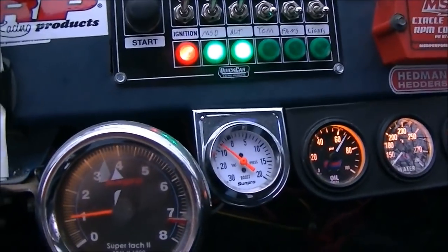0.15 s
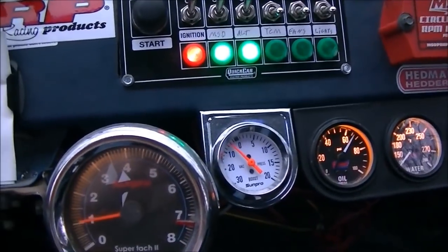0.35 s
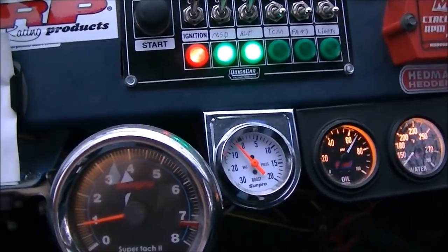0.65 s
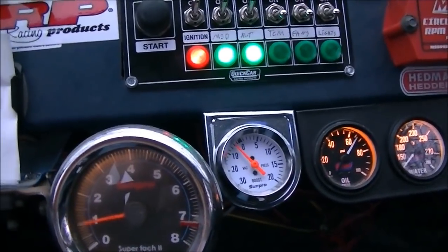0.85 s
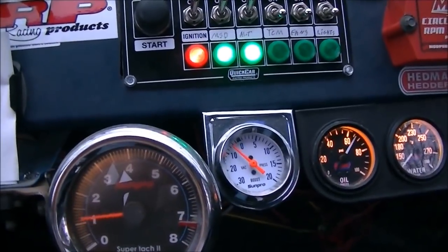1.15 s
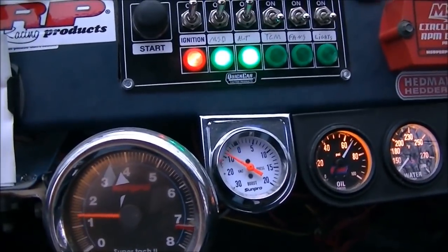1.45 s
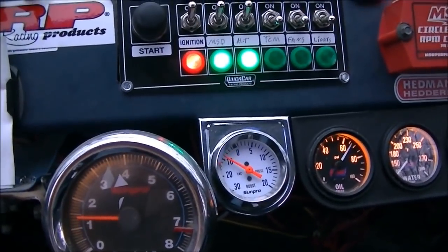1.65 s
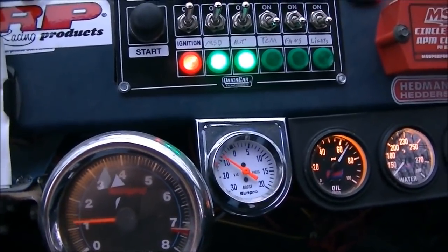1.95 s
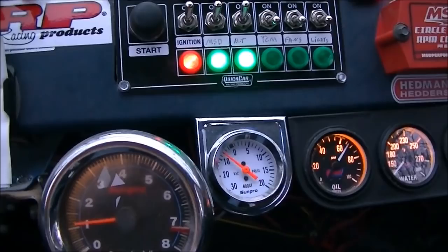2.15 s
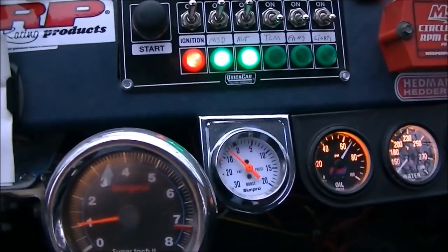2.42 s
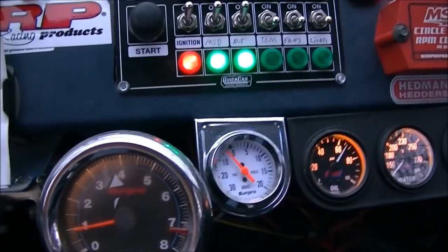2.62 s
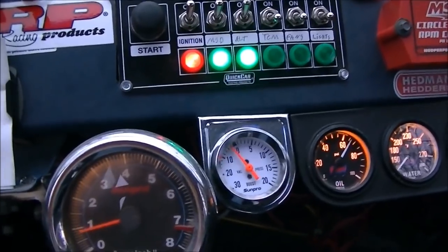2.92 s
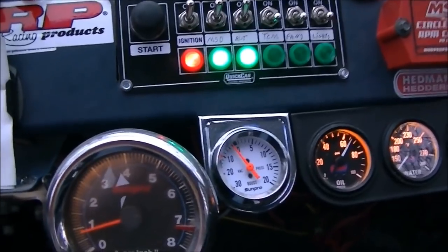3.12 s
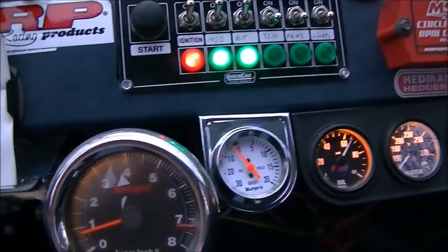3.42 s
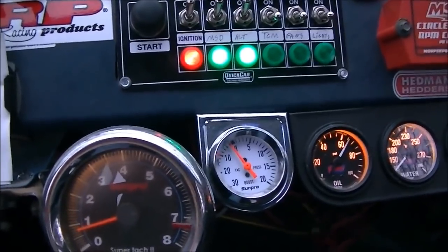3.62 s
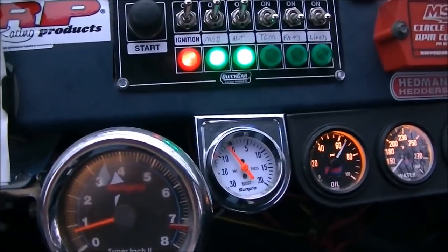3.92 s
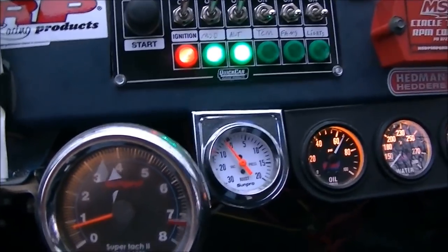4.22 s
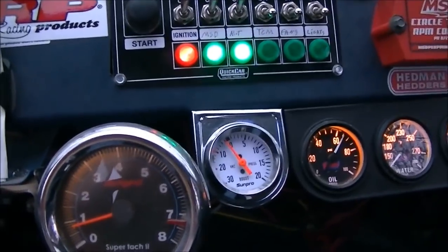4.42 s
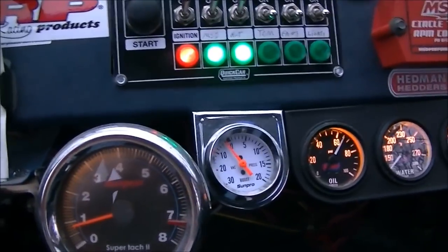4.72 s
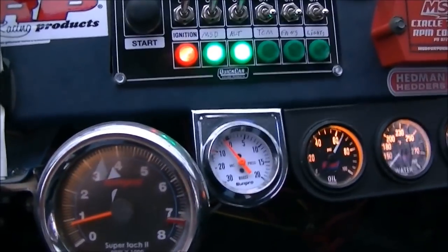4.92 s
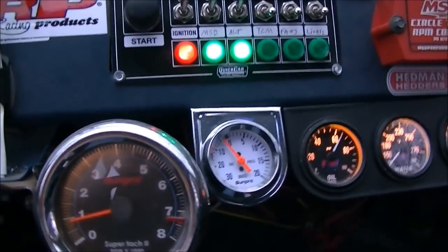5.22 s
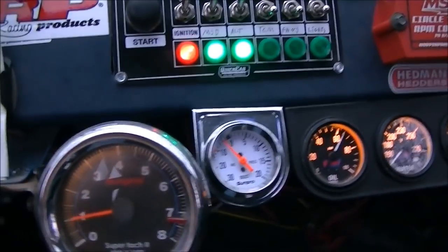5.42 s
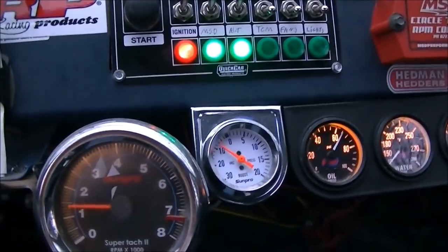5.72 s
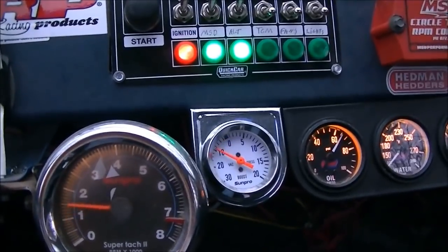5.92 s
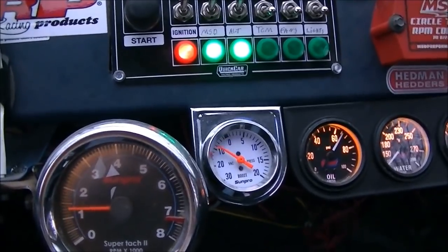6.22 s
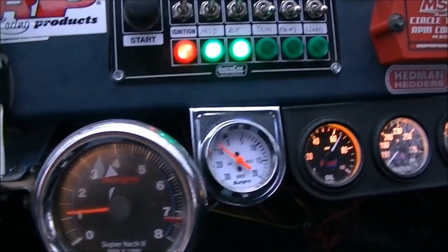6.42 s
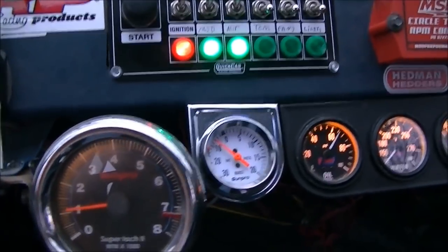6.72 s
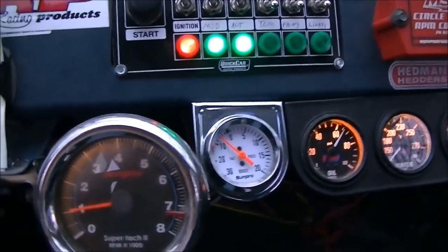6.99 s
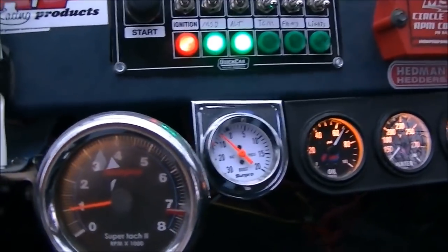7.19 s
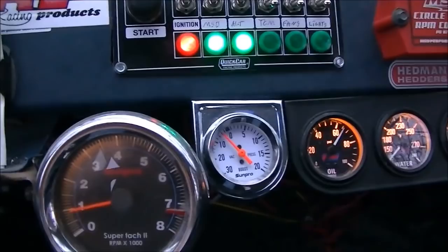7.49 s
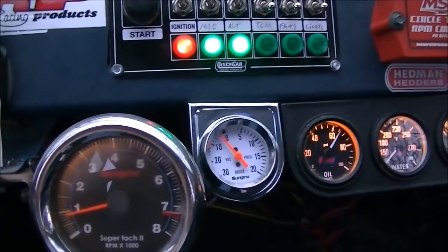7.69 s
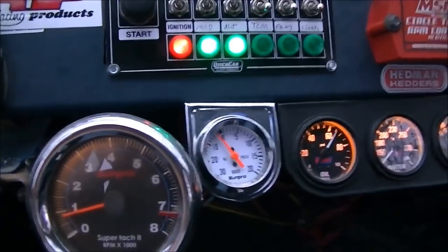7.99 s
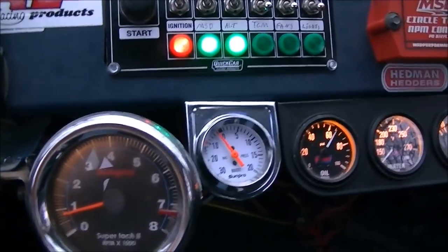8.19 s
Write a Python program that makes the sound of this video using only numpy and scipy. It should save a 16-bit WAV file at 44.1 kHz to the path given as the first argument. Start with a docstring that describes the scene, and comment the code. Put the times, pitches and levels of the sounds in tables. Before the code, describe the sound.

A big supercharged V8 engine idles unevenly throughout, heard close from inside a truck cab. Each firing gives a deep, boomy thump and a bright hissing puff from the open exhaust pipes, with a growl in the panels. Irregular stronger firings chuff loudly and leave a brief hollow ring in the pipes. Underneath run a low drone that follows the revs and a faint supercharger pulse. At about 1 second the revs swell gently, peaking near 1.5 seconds, then sag by 2.5 seconds into a slow, lumpy lope. At about 5.3 seconds they swell again, a little higher, peaking just before 6 seconds with a fuller, smoother drone. The engine eases down through 6.5 seconds and is back at its slow, choppy idle from about 7.6 seconds until the end at around 8.4 seconds.

```python
"""Inside a truck cab, a big supercharged V8 lopes at idle; twice the revs swell and sag again.
Every firing thumps the cab's low modes and blows a puff of gas out of the open pipes: a bright hiss
with a growl in the panels, drawn out by the surroundings. Under it run a drone at the firing rate and
the blower's faint pulse. On a lumpy cam only some cylinders catch well; those chuff loudly and set
the pipes ringing."""
import sys
import numpy as np
from scipy import signal
from scipy.fft import rfft, irfft, next_fast_len
from scipy.io import wavfile
from scipy.ndimage import uniform_filter1d

SR = 44100
rng = np.random.default_rng(int(sys.argv[2]) if len(sys.argv) > 2 else 0)


def bounce(signal):
    """Save signal as a 16-bit WAV file at the path given by the first command-line argument."""
    frames = np.transpose(np.atleast_2d(signal))
    limited = np.clip(frames, -1, 1)
    pcm = np.round(limited * 32767).astype(np.int16)
    wavfile.write(sys.argv[1], SR, pcm)


N = 368235

# revs and base levels of ordinary firings: t/s, firing rate/Hz, drone/dB, thump/dB, hiss/dB, growl/dB
REVS = [(0, 71.5, -24, -20.5, -51.5, -37), (.45, 67.1, -29.5, -23.5, -48.5, -36.5),
        (.8, 63.17, -24.5, -25.5, -57, -38), (1.05, 83, -31.5, -22.5, -47, -34),
        (1.17, 93.1, -19, -27, -49.5, -34), (1.4, 102.1, -22, -21.5, -51.5, -37),
        (1.7, 97.3, -24, -28.5, -55, -37.5), (1.9, 83.36, -27, -29.5, -51.5, -43.5),
        (2.02, 75.34, -44, -21, -51, -36.5), (2.3, 74.17, -34, -21.5, -51, -38),
        (2.55, 57.9, -26.5, -22, -51.5, -39.5), (2.8, 55.56, -28.5, -27.5, -52, -42),
        (3.1, 52.97, -30.5, -29, -62, -42), (3.8, 53.22, -30.5, -27, -54, -38.5),
        (4.3, 53.26, -30.5, -28, -57.5, -43), (4.6, 54.99, -32, -27, -66, -45),
        (4.85, 58.05, -29, -23.5, -54, -38.5), (5.12, 55.2, -29, -28, -55, -35.5),
        (5.4, 78.53, -34, -22, -48.5, -40), (5.55, 89.78, -19.5, -27, -47, -33.5),
        (5.72, 107.4, -19.5, -32, -51, -32), (5.86, 113.3, -16.5, -30, -51, -37),
        (6.0, 100.9, -26, -25.5, -56, -42), (6.2, 86.9, -26.5, -23, -53, -37.5),
        (6.45, 76.76, -27, -21, -50.5, -36.5), (6.95, 75.14, -32, -22, -53.5, -39),
        (7.35, 68.11, -35, -22, -57, -38.5), (7.65, 54.25, -29.5, -26, -57, -42.5),
        (8.05, 51.74, -31, -29, -58, -41), (8.35, 54.8, -30, -28, -55, -42)]
# strong firings: t/s, hiss peak/dB, growl peak over hiss peak/dB, # loss by the next firing/dB (sign ignored),
# thump size
CHUFFS = [(0.0924, -37, 3.5, 0.5, 1.36), (0.1387, -39, -3, 1.5, 1.16), (0.1827, -38, 3, 5.5, 1.26),
          (0.2823, -42, -2, 5, 1.1), (0.3262, -37, 3.5, 3, 1.06), (0.3727, -32, -2, 8.5, 1.9),
          (0.4181, -34, 4.5, 3, 1.24), (0.5226, -38, 8, 2, 2.1), (0.5698, -34, 3.5, 10, 1.6),
          (0.614, -32.5, -2, 6, 1.6), (0.6562, -34.5, 0.5, 4, 1.25), (0.7249, -38.5, 1, 1.5, 1.7),
          (0.7651, -37, 5.5, -1, 1.6), (0.8076, -32.5, 8.5, 5, 1.8), (0.8505, -34.5, 3, 2, 1.5),
          (0.892, -34.5, 2.5, 5, 1.78), (0.9877, -36, 3.5, -0.5, 1.24), (1.0648, -35, 7, 1, 1.04),
          (1.1225, -35.5, 6, 1, 0.94), (1.2416, -39, 11, 5, 0.62), (1.2847, -40, 9, 7, 1.3),
          (1.4282, -35, 4, 3, 1.3), (1.584, -40, 8, 1.5, 1.2), (1.692, -41.5, 8.5, 1, 1.1),
          (1.8608, -42.5, 9.5, 0, 1.48), (1.9065, -38.5, 8, 0.5, 1.05), (1.959, -37, 6, 0.5, 1.3),
          (2.0591, -47, -2, 7, 1.5), (2.1109, -43, 5, 2, 1.03), (2.1488, -35, -0.5, 2, 1.34),
          (2.1993, -35.5, 7, 12, 1.7), (2.3337, -46, -1, 3, 1.3), (2.4096, -41.5, 7.5, 3, 1.04),
          (2.4456, -35, 3, 5, 1.5), (2.5071, -35.5, 4, 1, 1.35), (2.5866, -33, 0.5, 2.5, 1.4),
          (2.6783, -42, 6, 1, 1.4), (2.812, -39, 2, 8, 1.5), (2.8805, -38, -1, 3, 1.2),
          (2.9234, -41, -5, 9, 0.92), (2.986, -37, 2.5, 1, 1.2), (3.044, -35.5, 0, 13, 1.72),
          (3.096, -35, 4.5, 2, 1.9), (3.2233, -38, -6, 7, 1.47), (3.2876, -44.5, -6, 3, 1.35),
          (3.3304, -38, 3, 3, 1.8), (3.404, -37, 3, 1, 1.75), (3.5013, -38.5, 0, 13, 0.87),
          (3.5551, -38, 3, 3.5, 1.3), (3.6304, -55, 4, 0, 1), (3.6895, -37, -1, 10, 1.4),
          (3.7454, -40.5, 1, 3, 1.36), (3.8006, -36, 7, 8.5, 1.8), (3.8532, -38, -6, 1.5, 1.296),
          (4.006, -32, 1.5, 7, 1.68), (4.097, -37, 3, 9, 1.9), (4.1945, -40, 5, 0.5, 1.397),
          (4.3038, -35.5, 4.5, 2, 1.5), (4.3881, -35, 2, 4.5, 1.47), (4.48, -39.5, 4.5, 1, 1.09),
          (4.595, -35, 5, 2.5, 1.43), (4.6853, -34.5, 4, 1, 1.6), (4.767, -38, 4, 3, 1.26),
          (4.817, -34, 3.5, 11, 1.6), (4.8656, -33.5, 2.5, 4, 1.12), (4.9296, -35, 4.5, 3, 1.21),
          (4.9529, -33.5, 1, 2, 1.5), (5.031, -36.5, 8.5, 8.5, 1.21), (5.0775, -35.5, 1.5, 7, 1.2),
          (5.1293, -32, -6, 6, 1.7), (5.1601, -33, -8, 11, 1.4), (5.2071, -33, 4, 2, 1.65),
          (5.253, -32.5, 5.5, 3.5, 1.324), (5.3114, -35, 7.5, 4, 1.9), (5.3674, -34.5, 3.5, 3, 1.52),
          (5.3961, -33.5, 7, 2, 1.57), (5.433, -33, 6.5, 3, 1.4), (5.4954, -34, 7.5, 10, 0.98),
          (5.5289, -33.5, 1, 9, 1.4), (5.7144, -34, 3, 3, 1.06), (5.8633, -39, 9.5, 4, 0.94),
          (5.988, -40, 9, -1, 1.2), (6.04, -41, 5, -2.5, 1.7), (6.1894, -39.5, 7, 4, 1.4),
          (6.3737, -35.5, 5.5, 2.5, 1.4), (6.4519, -34, 6, 8, 2.18), (6.5176, -46, -1, 5, 1.64),
          (6.5984, -34, 3.5, 4, 1.5), (6.6612, -34.5, 3.5, -2.5, 1.6), (6.7291, -37, -9, 9, 1.94),
          (6.7954, -36, 3, 3, 1.2), (6.8792, -33, 3, 1.5, 1.7), (6.9485, -35, 5.5, 1.5, 1.509),
          (7.018, -34.5, 0.5, 1.5, 1.45), (7.1096, -33, 3, 6.5, 1.4), (7.1823, -36, 2, 5, 1.13),
          (7.2563, -34.5, 2, 1, 1.4), (7.3458, -34.5, -5, 5, 1.4), (7.4228, -35.5, 1, 6, 1),
          (7.5072, -37.5, -2, 2, 1.47), (7.6132, -34, 1.5, 8.5, 1.43), (7.7039, -39.5, 3, 4, 1.58),
          (7.8004, -36, 2, 1.5, 1.46), (7.907, -36, 5.5, 7, 1.4), (7.994, -40, 6, 13, 1.17),
          (8.0651, -41, 5.5, 2, 1.9), (8.1458, -38.5, 3, 0.5, 1.4), (8.1919, -34, 4, 5.5, 1.87),
          (8.2528, -36.5, 5.5, 4, 1.38), (8.3183, -37.5, 7.5, 0, 1.04)]
# low modes of cab and pipes: f/Hz, width/Hz, level/dB
CAB_MODES = [(46, 30.8, -5.5), (97.9, 23.5, 2), (123.3, 15.6, 2), (152.5, 22.5, -14), (200.3, 13.5, -19),
             (269.7, 8.8, -24), (309, 24, -22.5), (386, 34, -25)]


def amp(db):
    return 10 ** (np.asarray(db) / 20)


def along(points, hz):
    """(f/Hz, value) points, read on a log frequency axis."""
    f, v = np.transpose(points)
    return np.interp(np.log(hz + 1), np.log(f + 1), v)


def revs_at(t):
    """Firing rate and the drone, thump, hiss and growl levels at times t."""
    s, *columns = np.transpose(REVS)
    return [np.interp(t, s, c) for c in columns]


def filtered(x, response):
    """x shaped by a complex frequency response."""
    m = next_fast_len(N + SR // 2)
    return irfft(rfft(x, m) * response(np.fft.rfftfreq(m, 1 / SR)), m)[:N]


def modes(table):
    """The response of a bank of resonances of alternating polarity."""
    return lambda f: sum((-1) ** k * amp(db) * 1j * f * width / (hz * hz - f * f + 1j * f * width)
                         for k, (hz, width, db) in enumerate(table))


def train(times, sizes):
    """One impulse for each firing."""
    return np.bincount(np.clip(np.round(times * SR).astype(int), 0, N - 1), sizes, N)


def puffs(times, db, rise_s, fall_t60, echo_t60, echo_db):
    """Envelope of overlapping gas bursts and their echo from the surroundings: powers add."""
    step_s = .0005
    t = np.arange(0, .5, step_s)
    decay = amp(-120 * t / fall_t60) + amp(2 * echo_db - 120 * t / echo_t60)
    shape = (1 - np.exp(-t / rise_s)) ** 2 * decay
    starts = np.bincount(np.round(np.clip(times, 0, None) / step_s).astype(int), amp(2 * db))
    power = np.abs(signal.fftconvolve(starts, shape / shape.max()))
    return np.interp(np.arange(N) / SR, np.arange(len(power)) * step_s, np.sqrt(power))


def firings():
    """The crank: firings counted up to each sample, their times, and the indices of the strong ones."""
    t = np.arange(N) / SR
    count = np.cumsum(revs_at(t)[0]) / SR
    chuff_s = np.transpose(CHUFFS)[0]
    loping_s = chuff_s[revs_at(chuff_s)[0] < 78]  # at low revs the crank keeps step with the chuffs
    angle = 2 * np.pi * np.interp(loping_s, t, count)
    slip = np.arctan2(uniform_filter1d(np.sin(angle), size=5), uniform_filter1d(np.cos(angle), size=5))
    count -= np.interp(t, loping_s, np.unwrap(slip)) / (2 * np.pi)
    times = np.interp(np.arange(np.ceil(count[0]), count[-1]), count, t)
    return count, times, np.abs(times - chuff_s[:, None]).argmin(axis=1)


def lope(times, strong):
    """After a good catch, cylinders catch less and less: each firing's chuff, and its dB below it."""
    index = np.arange(len(times))
    chuff = np.clip(np.searchsorted(strong, index, side="right") - 1, 0, None)
    lack_db = np.abs(np.transpose(CHUFFS)[3][chuff]) * np.abs(index - strong[chuff]) ** 1.85
    lead_in = np.setdiff1d(np.clip(strong - 1, 0, None), strong)  # the firing just before a strong one
    chuff[lead_in], lack_db[lead_in] = np.searchsorted(strong, lead_in), 5.5
    return chuff, lack_db


def drone(count, times, strong):
    """Firings merge into a note that swells with each good catch."""
    # straight from the pipes: multiple of the firing rate, level against the note/dB
    pipe_orders = [(2, -15), (4, -25.5)]
    # fed into the cab's modes: multiple of the firing rate, level against the note/dB
    cab_orders = [(1.25, -8.5), (2, -12)]
    t = np.arange(N) / SR
    caught_db = np.clip(3.5 - lope(times, strong)[1], 0, None)
    swell_db = 0.31 * np.interp(t, times, caught_db - caught_db.mean())
    level = np.sqrt(2) * amp(revs_at(t)[1] + swell_db)
    note = np.sin(2 * np.pi * (count + 0.038))
    overtones = sum(amp(db) * np.sin(2 * np.pi * order * count) for order, db in pipe_orders)
    cab_tones = sum(amp(db) * np.sin(2 * np.pi * order * count) for order, db in cab_orders)
    return level * (note + overtones) + filtered(level * cab_tones, modes(CAB_MODES))


def blower(count, pulses_per_firing=2.67):
    """The supercharger's rotors pulse faintly through the cab's modes, harder as the revs climb."""
    octaves = np.log2(revs_at(np.arange(N) / SR)[0] / 70)
    rotors = amp(-29.5 + 21 * octaves) * np.sin(2 * np.pi * pulses_per_firing * count)
    return filtered(rotors, modes(CAB_MODES))


def thump(times, strong):
    """Each firing pushes the cab's low modes; charge and timing differ from one to the next."""
    # cylinders in firing order: charge over or under the mean
    cylinders = [0.31, 0.32, -0.43, -0.056, 0.21, 0.083, -0.26, 0.11]
    charge_luck, timing_luck = rng.uniform(-1, 1, (len(times), 2)).T
    size = .05 + np.resize(cylinders, len(times)) + 0.92 * charge_luck
    chuff, lack_db = lope(times, strong)
    catch = np.transpose(CHUFFS)[4][chuff] * amp(-lack_db)
    size = np.where(catch > .55, catch + 0.34 * charge_luck, size)  # a good catch carries its neighbours
    wander_s = 0.001 * timing_luck - .002
    pushes = train(times + wander_s, size * amp(revs_at(times)[2]))
    # a soft push, less the deepest bass
    cab = lambda f: modes(CAB_MODES)(f) * (1j * f / (42 + 1j * f)) ** 4 / (1 + 1j * f / 450) ** 3
    return filtered(pushes, cab) / np.std(filtered(train(times, size), cab))


def patchy_noise(depth_db):
    """Noise whose colour keeps changing in small patches, as loose metal rattles in the jet."""
    spectrum = signal.stft(rng.standard_normal(N), nperseg=512)[2]
    patches = uniform_filter1d(rng.standard_normal(spectrum.shape), size=3, axis=0)
    patches = uniform_filter1d(patches, size=5, axis=1)
    patches /= np.sqrt(np.mean(patches ** 2))
    return signal.istft(spectrum * amp(depth_db * patches), nperseg=512)[1][:N]


def hiss(times, level_db):
    """The gas jet: bright puffs that start sharply and linger longest in the lower bands."""
    # colour of the gas noise: f/Hz, level/dB
    jet_colour = [(710, -8.5), (1200, 0), (1490, -3.5), (1600, -4.5), (1970, -6), (2210, -5), (2950, -10.5),
                  (7760, -10.5), (11400, -15.5), (15600, -33.5)]
    # bands of the jet: f/Hz, puff t60/s, echo t60/s, echo/dB, dB gained per dB of puff
    jet_bands = [(1500, 0.091, 0.54, -13, 1.03), (4400, 0.1, 0.5, -19, 1.1774), (8000, 0.09, 0.14, -18, 1),
                 (11400, 0.089, 0.11, -18.5, 1.1), (15000, 0.043, .12, -16, 1.53)]
    noise = patchy_noise(depth_db=2.5)
    scale = np.std(filtered(noise, lambda f: amp(along(jet_colour, f))))
    # hard puffs are brighter, quick ones duller
    bright_db = level_db + 59 - 7 * np.log2(revs_at(times)[0] / 70)
    jet = np.zeros(N)
    for centre_hz, fall_t60, echo_t60, echo_db, slope in jet_bands:
        share = [(hz, float(hz == centre_hz)) for hz, *_ in jet_bands]
        band = filtered(noise, lambda f: amp(along(jet_colour, f)) * along(share, f)) / scale
        jet += band * puffs(times, level_db + (slope - 1) * bright_db, 0.0058, fall_t60, echo_t60, echo_db)
    return jet


def growl(times, level_db, knock):
    """Just behind the hiss, the gas shakes panels and pipes and its pressure front knocks them."""
    # panel and pipe modes: f/Hz, width/Hz, level/dB
    panels = [(193.2, 30.7, 9), (275.3, 34, 4.5), (309.7, 39, 2.5), (399.8, 33.5, 2), (476, 45, -4),
              (532, 25.4, -0.5), (628, 87, -3.5), (721, 40.7, -2.5), (793, 30, -4.5), (910.5, 29, -3.5),
              (964, 70, -8), (1112, 81, -10), (1210, 49, -14.5), (1358, 31, -13.5), (1568, 39, -17),
              (2354, 250, -22), (2480, 215, -21.5)]
    noise = rng.standard_normal(N)
    burst = noise * puffs(times + 0.0034, level_db, 0.0037, fall_t60=0.091, echo_t60=0.32, echo_db=-12)
    burst += train(times + .007, amp(level_db + 18) * knock)
    fullness = amp(3.05 * np.log2(revs_at(np.arange(N) / SR)[0] / 70))  # the pipes fill out with revs
    low = filtered(burst, modes([m for m in panels if m[0] < 450])) * fullness
    high = filtered(burst, modes([m for m in panels if m[0] >= 450]))
    return (low + high) / np.std(filtered(noise, modes(panels)))


def exhaust(times, strong):
    """Each firing blows a puff of hiss and growl, louder the better its cylinder catches."""
    crest_db = 9.5  # a puff's peak over its rms
    growl_crest_gap_db = 7  # growl puffs peak this much less above their rms than hiss puffs do
    chuff_s, peak_db, over_db = np.transpose(CHUFFS)[:3]
    times = times.copy()
    times[strong] = chuff_s - .003  # the gas starts just before its peak
    chuff, lack_db = lope(times, strong)
    caught_db = peak_db[chuff] - crest_db - lack_db
    puff_luck, growl_luck, knock_luck = rng.standard_normal((len(times), 3)).T
    puff_luck[strong] = growl_luck[strong] = 0
    hiss_db, growl_db = revs_at(times)[3:]
    hiss_db = np.maximum(hiss_db, caught_db) + 0.97 * puff_luck
    growl_db = np.maximum(growl_db, caught_db + over_db[chuff] + growl_crest_gap_db)
    growl_db += 3.06 * puff_luck + 2.05 * growl_luck
    return hiss(times, hiss_db) + growl(times, growl_db, np.tanh(knock_luck))


def pipe_ring():
    """The gas of each strong firing sets the pipes ringing roughly for a moment."""
    # hollow ring of the pipes: f/Hz, width/Hz, level/dB
    pipes = [(307.6, 23, 0), (394.6, 23, -0.5), (727.6, 20.7, 1.5), (812, 30, -5.5)]
    chuff_s, peak_db, over_db = np.transpose(CHUFFS)[:3]
    ring_db = peak_db + over_db - 4.5
    noise = rng.standard_normal(N)
    gas = noise * puffs(chuff_s, ring_db, rise_s=0.0043, fall_t60=0.037, echo_t60=0.26, echo_db=-11)
    return filtered(gas, modes(pipes)) / np.std(filtered(noise, modes(pipes)))


def scene():
    """Gas noise over the engine's low end, all timed by one crank, in mono."""
    count, times, strong = firings()
    gas = exhaust(times, strong) + pipe_ring()
    low_end = drone(count, times, strong) + blower(count) + thump(times, strong)
    return (gas - low_end)[None]


def record(dry):
    """The very top of the treble is cut off sharply."""
    return filtered(dry[0], lambda hz: hz < 15750)[None]


dry = scene()
out = record(dry)
bounce(out)
```